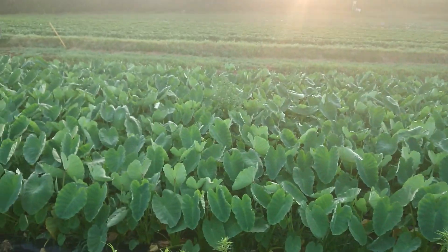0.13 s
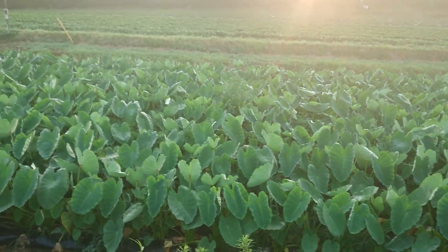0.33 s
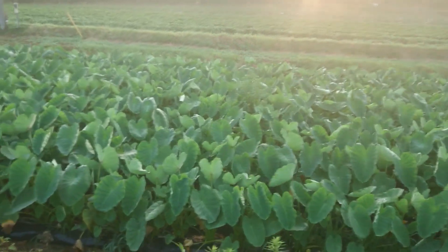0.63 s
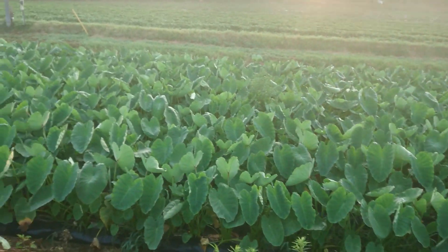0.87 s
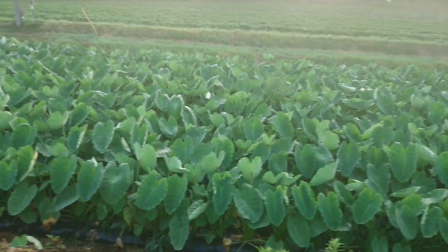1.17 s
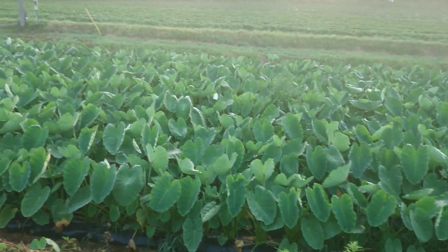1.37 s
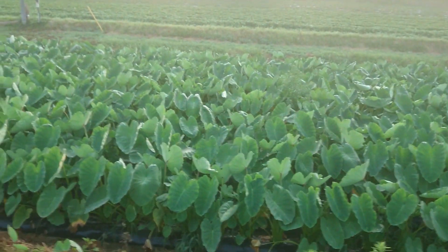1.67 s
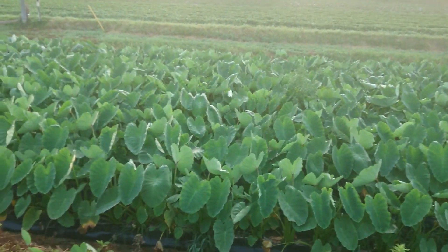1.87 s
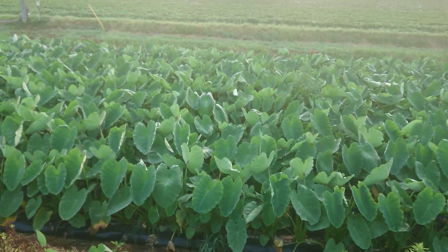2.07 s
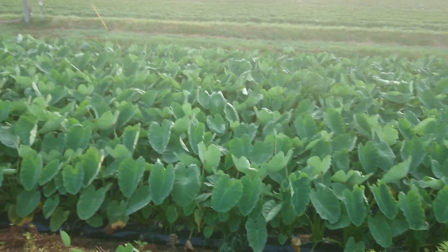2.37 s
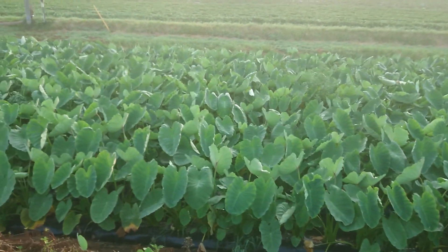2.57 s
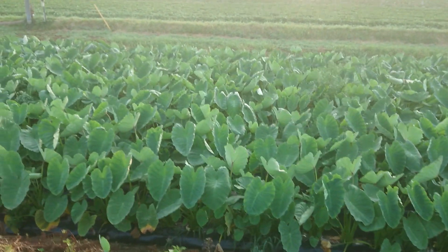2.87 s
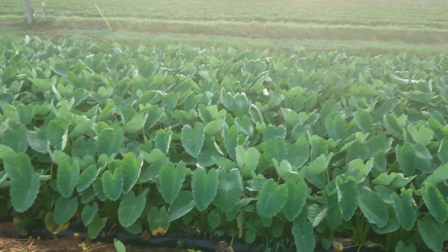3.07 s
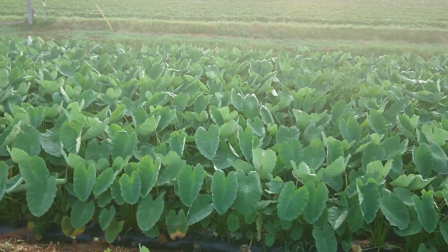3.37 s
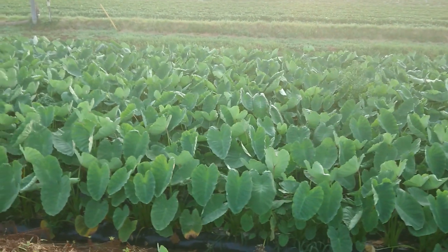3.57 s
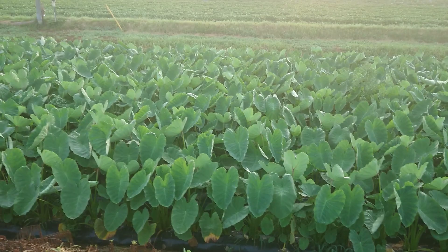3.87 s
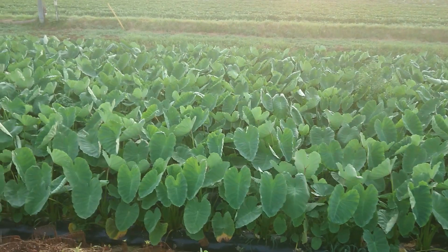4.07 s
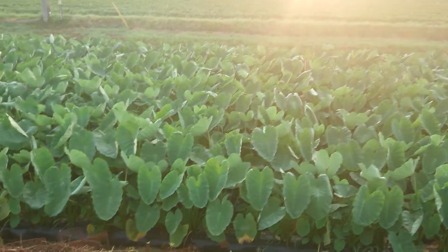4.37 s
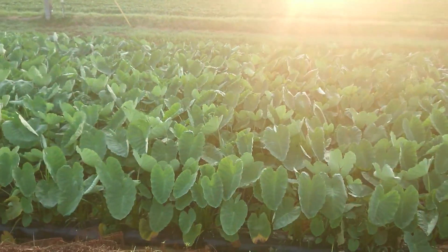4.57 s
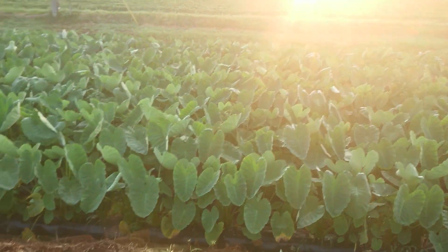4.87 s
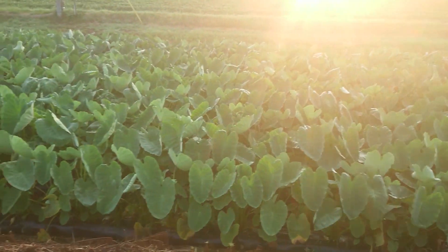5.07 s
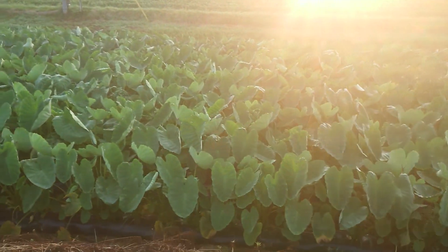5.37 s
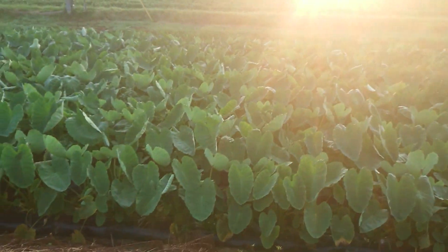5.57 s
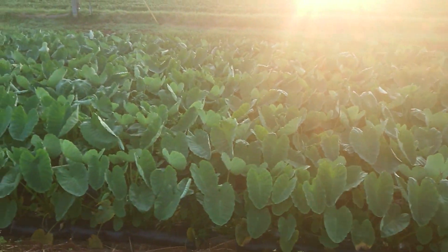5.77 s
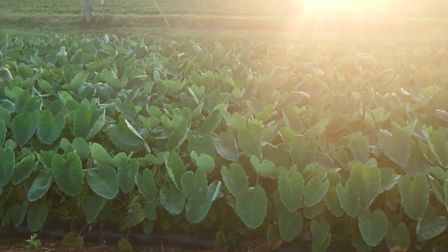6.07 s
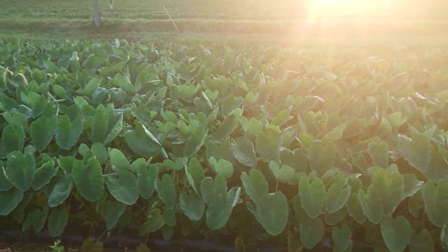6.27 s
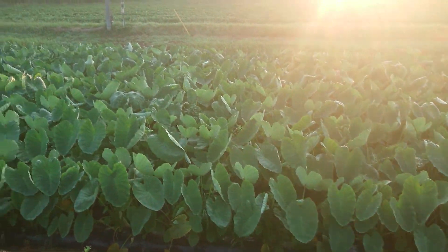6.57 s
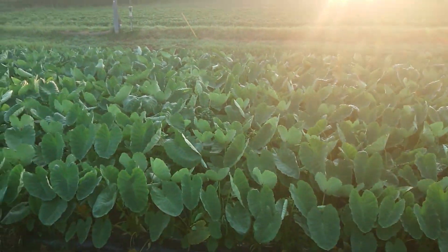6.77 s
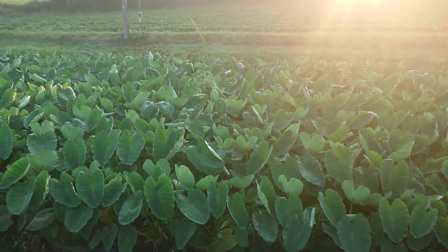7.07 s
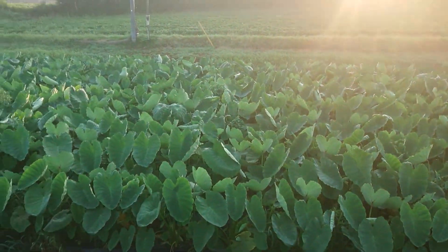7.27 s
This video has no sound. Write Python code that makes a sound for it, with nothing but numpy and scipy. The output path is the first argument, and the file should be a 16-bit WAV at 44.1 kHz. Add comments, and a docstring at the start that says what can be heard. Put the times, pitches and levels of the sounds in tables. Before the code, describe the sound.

An open crop field, heard on a handheld phone with uneven stereo and little echo. A far cicada chorus forms a constant bright hiss, shifting in colour, with one steady, whining singer on the right. Close shoes crack dry soil strongly at 1.05 s, again at 2.3 s and 6.0-6.2 s, with faint grit and small ticks between and soft low thuds. Short bird whistles come at 0.55 and 0.9 s, a faint one at 3.4, then several from 5.4 to 6.3 s. From 2.2 s a right-hand cicada swells, its throbbing song speeding and rising most around 4 s, weakening after 5.9 and stopping at 6.55. A coarse buzz on the left peaks near 4.7 s. Katydids rasp rapidly from 3.0 to about 5.3 s, louder left; fainter, very high rasps come from farther off at 1.9 s and after 5.1. Thin cricket tones enter around 5.9 s. Faint distant rumble lies beneath.

```python
"""A far chorus of cicadas at the edge of a farm field at dusk: click trains blurred into hiss. On the right one
cicada sings steadily (a few overtones) and one winds up (speeding clicks); on the left one buzzes (slow
clicks). Two katydids rasp close by and a fainter, higher one rasps too (bursts of clicks or noise), crickets
(thin tones) and small birds (bent tones) whistle. Shoes crunch on dry soil (ticks, knocks, grains and thuds)
over a low distant rumble (filtered noise). A hand-held phone hears it all through two unequal ports."""
import sys
import numpy as np
from scipy import signal
from scipy.fft import rfft, irfft
from scipy.io import wavfile
from scipy.ndimage import uniform_filter1d

SR = 44100
rng = np.random.default_rng(int(sys.argv[2]) if len(sys.argv) > 2 else 0)


def boost(x):
    """Linear amplitude factor 10**(x/20) for a level x in decibels (scalar or array-like)."""
    u = np.asarray(x, float) / 20
    return 10 ** u


def persist_wave(psi):
    """Save psi, clipped to +-1, as 16-bit WAV."""
    counts = np.round(np.clip(psi, -1, 1) * 32767).astype(np.int16)
    wavfile.write(sys.argv[1], SR, np.atleast_2d(counts).T)


N = 326996
T = np.arange(N) / SR  # time in seconds

# Tone colour of cicada song. Each row: frequency in Hz, strength in relative dB.
SONG_COLOUR = [(4950, -24.5), (5150, -5.5), (5600, -4.5), (6300, 2.5), (6800, -0.5), (7800, 1), (8300, 2),
               (9300, -3.5), (9550, -6), (11000, -24)]


def level(x, db):
    """Scale to an rms level (a kind of average loudness)."""
    return x * boost(db) / np.sqrt(np.mean(x ** 2))


def curve(rows):
    """Draw straight lines between the rows of a time table: one value per sample for each column."""
    s, *columns = np.transpose(rows)
    return [np.interp(T, s, c) for c in columns]


def colour(x, points, size=2048):
    """Filter through (Hz, dB) points without sounding early, using the cepstrum of the log gain."""
    hz, db = np.transpose(points)
    grid = np.arange(size // 2 + 1) * SR / size + 1
    log_gain = np.log(boost(np.interp(np.log(grid), np.log(hz), db)))
    cepstrum = irfft(log_gain)
    # fold the second half onto the first, so that the response starts at once
    cepstrum[1:size // 2] *= 2
    cepstrum[size // 2 + 1:] = 0
    response = irfft(np.exp(rfft(cepstrum)))
    return signal.oaconvolve(x, response)[:N]


def ring(x, hz, width):
    """One resonance, width in Hz, with gain 1 at the centre."""
    return signal.lfilter(*signal.iirpeak(hz, hz / width, fs=SR), x)


def walk(rate):
    """Random wandering: values held for 1 / rate seconds, then smoothed twice."""
    hold = int(SR / rate)
    steps = np.repeat(rng.standard_normal(N // hold + 1), hold)
    return uniform_filter1d(uniform_filter1d(steps, hold), hold)[:N]


def clicks(rate_hz, jitter, scatter_db):
    """A click each cycle, placed between samples; time (jitter in cycles) and size vary a little."""
    phase = np.cumsum(rate_hz + 0 * T) / SR + rng.random()
    chance = rng.standard_normal((N // 50, 2))
    cycles = np.arange(1, int(phase[-1]))
    chance = chance[:len(cycles)]
    at = np.interp(cycles + jitter * chance[:, 0], phase, np.arange(N))
    # spread each click over 17 samples, so that it can fall between two of them
    place = np.clip(at.astype(int)[:, None] + np.arange(-8, 9), 0, N - 1)
    taps = np.sinc(place - at[:, None]) * np.hanning(19)[1:-1]
    sizes = boost(scatter_db * chance[:, 1:])
    return np.bincount(place.ravel(), (taps * sizes).ravel(), N)


def crowd():
    """Click trains near one rate, blurred by distance into hiss."""
    trains = 0
    for hz in 238 + 9 * rng.standard_normal(3):
        swell = boost(3.0 * walk(1.5))
        trains = trains + swell * clicks(hz * (1 + .002 * walk(.8)), .002, 1.2)
    return colour(level(trains, -4) + rng.standard_normal(N), SONG_COLOUR)


def chorus():
    """One crowd ahead reaches both ports, one on each side its own port; low, middle and high swell apart."""
    # Each row: time in seconds, then low, middle and high singers in relative dB.
    group_levels = [(0, -39, -40.5, -34.5), (.6, -40.5, -39, -37.5), (3.2, -39.5, -36, -42.5),
                    (4.6, -37, -34, -50.5), (5.7, -40, -35.5, -46), (6.44, -36, -42, -42.5),
                    (6.58, -42.5, -37.5, -36.5), (7.41, -45, -50.5, -34.5)]
    # The two borders between low, middle and high singers, in Hz.
    group_edges = (7390, 7890)
    share = 0.07  # power of the song that both ports hear alike, from 0 to 1
    groups_db, ahead = curve(group_levels), crowd()
    ports = []
    for port_db in (-.6, .6):
        song = np.sqrt(share) * ahead + np.sqrt(1 - share) * crowd()
        under = [signal.sosfiltfilt(signal.butter(4, hz, fs=SR, output="sos"), song) for hz in group_edges]
        groups = under[0], under[1] - under[0], song - under[1]
        mix = sum(level(g, 0) * boost(db + 2.4 * walk(9)) for g, db in zip(groups, groups_db))
        ports.append(mix * boost(port_db - 4.0))
    return np.array(ports)


def steady_cicada():
    """An even click rate on the right: its overtones come and go, each on its own, as the air moves."""
    rate_hz, fade_db = 249.4, 7
    phase = 2 * np.pi * np.cumsum(rate_hz * (1 + .002 * walk(1) + .0015 * walk(100))) / SR
    tones = 0
    for k in range(31, 38):
        tone = np.sin(k * phase + 2 * np.pi * rng.random())
        tones = tones + boost(fade_db * walk(1.5)) * tone
    return level(tones, -42) * boost([[-8], [0]])  # left, right


def buzzing_cicada():
    """Slower clicks, each heard apart, ring one high resonance; louder on the left."""
    # Each row: time in seconds, level in dB at the left port before it wavers.
    buzz_levels = [(2.3, -55), (2.7, -43), (3.3, -49), (4.1, -39.5), (4.75, -36), (5.1, -38), (5.3, -41),
                   (5.75, -47)]
    body = clicks(118.8 * (1 + 0.0033 * walk(3.8)), 0.032, 1.9)
    for width in (300, 600, 900):
        body = ring(body, 9380, width)
    return level(body, 0) * boost(curve(buzz_levels)[0] + 2 * walk(11)) * boost([[0], [-10]])


def field():
    """Distant rumble and air: filtered noise, with the bass partly shared by both ports."""
    # Each row: frequency in Hz, noise strength in relative dB.
    air_colour = [(25, -71.5), (70, -62.5), (110, -72.5), (200, -81.5), (350, -83.5), (550, -93),
                  (900, -99.0), (1500, -94.5), (10000, -104), (12500, -110), (15500, -114)]
    shared, left, right = (colour(rng.standard_normal(N), air_colour, size=8192) for _ in range(3))
    common = ring(shared, 219, 314)
    both = np.array([left, right]) * 0.85 + 1.07 * common
    return both * boost(10 * np.log10(SR / 2) - 1.0)


def footsteps():
    """Cracks are a sharp tick on a dull knock; under each step grit crackles, and some steps thud."""
    # Clods and stalks cracking underfoot.
    # Each row: start in seconds, strength in relative dB, knock in Hz, tick in dB against that strength.
    cracks = [(0.058, -25.5, 1390, -11), (.595, -33, 1490, 1), (0.726, -18.5, 1970, -13.5),
              (1.035, -1, 1720, -21), (1.047, -19.5, 1800, 5.5), (1.0611, -11.5, 1710, -3),
              (1.067, -16, 1900, -9), (1.096, -9.5, 1970, -2), (1.164, -39.5, 2070, 9),
              (1.2, -23.5, 1090, -11.5), (1.876, -24, 450, -11.5), (2.274, -34, 885, 12),
              (2.286, -10, 1980, -9.5), (2.296, -19, 1810, 4), (2.298, -17, 1030, -3),
              (2.304, -13, 990, -13), (2.3134, -19.5, 1200, -2), (2.413, -28, 915, -8),
              (2.465, -18, 960, -23), (2.9, -19.5, 1970, -15.5), (2.986, -31.5, 1630, 1),
              (3.1, -28, 1370, -9), (3.539, -18.5, 1840, -13), (3.618, -25.5, 1850, -25),
              (3.719, -24.5, 850, -12), (3.839, -32, 1610, -7.5), (4.285, -36, 1000, -17.5),
              (4.478, -37.5, 1540, -2), (4.915, -29.5, 1660, -4.5), (4.974, -23, 1080, -33),
              (5.002, -23.5, 1330, -25), (5.094, -25, 2050, -11), (5.524, -25, 474, -24),
              (5.555, -30.5, 1980, -25), (5.599, -27.5, 2050, -2.5), (6.002, -11, 1860, -4.5),
              (6.024, -17, 2080, -3.5), (6.0383, -11.5, 1530, -4), (6.04, -3.5, 1880, -34),
              (6.1028, -24.5, 1310, 2), (6.111, -11, 1090, -10), (6.127, -28, 1480, 7.5),
              (6.198, -24, 1420, -23), (6.215, -23.5, 580, -20), (6.762, -33, 2230, 6.5),
              (7.377, -42, 824, 0)]
    # Weight rolling onto a shoe. Each row: start in seconds, grit in relative dB, length in seconds.
    shoe_loads = [(0.243, -54, 0.19), (0.497, -54, 0.22), (1.053, -35.5, 0.081), (1.748, -56.5, 0.26),
                  (2.284, -34.5, 0.08), (2.979, -51, 0.14), (3.529, -51.5, 0.2), (4.284, -53, 0.13),
                  (4.868, -53.5, 0.24), (5.523, -50, 0.18), (6.025, -41.5, 0.081), (6.098, -39.5, 0.06),
                  (6.73, -56, 0.22), (7.355, -54, 0.16)]
    # Dull thuds of the ground. Each row: time in seconds, level in dB.
    thuds = [(0.051, -35.5), (1.071, -33), (1.288, -35), (5.541, -33), (6.816, -31)]
    # Grain sizes. Each row: ringing frequency in Hz, width in Hz, level in relative dB.
    grain_sizes = [(633, 490, 3), (1100, 910, 2), (1630, 1200, 1), (3900, 2200, -8)]
    # Tone colour of dry soil. Each row: frequency in Hz, strength in relative dB.
    soil_colour = [(150, -7), (1000, 0.5), (2600, -10), (4000, -1), (6000, -8), (11000, -15), (16000, -61)]
    grains_per_s, extra_grains_per_load = 70, 12000  # a heavier step breaks more grains

    ticks, knocks, t = np.zeros(N + SR), np.zeros(N + SR), T[:800]
    crumbles = rng.standard_normal((len(cracks), len(t)))
    for (s, db, hz, tick_db), crumble in zip(cracks, crumbles):
        i = int(s * SR)
        span = slice(i, i + len(t))
        fade = np.exp(-t * hz / 1.78)  # a cycle or two
        knocks[span] += boost(db - 5.5) * fade * np.sin(2 * np.pi * hz * t) * np.minimum(t / 0.00029, 1)
        ticks[span] += boost(db + tick_db) * np.exp(-t / 0.0038) * crumble
        # loose bits settle
        knocks[span] += boost(db - 14.5) * np.exp(-t / 0.011) * ring(crumble, hz, hz / 2)

    load = 0
    for s, db, length in shoe_loads:
        rise = np.clip((T - s) / (0.057 * length), 0, 1)
        load = load + boost(db) * rise * np.exp(-((T - s) / length) ** 2)
    thud = 0
    for s, db in thuds:
        thud = thud + boost(db) * np.clip((T - s) / 0.0067, 0, 1) * np.exp(-np.abs(T - s) / 0.034)

    # each size of grain breaks at its own moments and rings for a cycle or two
    shape = (len(grain_sizes), N)
    breaks = rng.random(shape) < (grains_per_s + extra_grains_per_load * load) / SR
    breaks = breaks * boost(4.8 * rng.standard_normal(shape))
    crunch = 0
    for grains, (hz, width, db) in zip(breaks, grain_sizes):
        crunch = crunch + level(ring(ring(grains, hz, width), hz, 2 * width), db) / 2
    # the rustle differs at each port
    rustle = level(np.array([colour(rng.standard_normal(N), soil_colour) for _ in range(2)]), -8)
    ground = level(ring(ring(rng.standard_normal(N), 73, 44), 93, 300), 0) * thud
    return knocks[:N] + boost(5.5) * colour(ticks[:N], soil_colour) + (crunch + rustle) * load + ground


def whistles():
    """Small birds: short, slightly husky glides, bent through three pitches."""
    # Each row: start in seconds, length in seconds, first, middle and last pitch in Hz,
    # level in dB before the huskiness.
    glides = [(0.547, 0.085, 3750, 3400, 2740, -51), (0.875, 0.077, 3960, 4870, 6050, -45.5),
              (3.408, 0.066, 3750, 3680, 3400, -60), (5.43, 0.068, 5600, 4670, 4460, -54),
              (5.642, 0.053, 4300, 4900, 4070, -47), (5.83, 0.054, 4100, 4760, 4100, -49),
              (6.297, 0.088, 3210, 3770, 4830, -56)]
    out = np.zeros(N)
    for s, length, first, middle, last, db in glides:
        u = np.arange(int(length * SR)) / (length * SR)  # 0 to 1 along the glide
        hz = first * (1 - u) * (1 - 2 * u) + 4 * middle * u * (1 - u) + last * u * (2 * u - 1)
        i = int(s * SR)
        out[i:i + len(u)] += boost(db) * np.sin(np.pi * u) * np.sin(2 * np.pi * np.cumsum(hz) / SR)
    return out * boost(7.0 * walk(250))


def strokes(times, db):
    """A short rounded swell at each wing stroke, uneven in strength."""
    shape = np.exp(-(np.arange(-1000, 1001) / SR / 0.0093) ** 4)  # 9.3 ms to each side
    sizes = boost(db + 1.1 * rng.standard_normal(len(times)))
    return signal.oaconvolve(np.bincount((times * SR).astype(int), sizes, N), shape, "same")


def high_katydid():
    """Wing strokes of a fainter, higher katydid, in bouts: narrow, high noise, half blurred."""
    # Each row: start in seconds, length in seconds, stroke level in dB before the blur is added.
    bouts = [(1.857, 0.6, -57), (5.138, 0.31, -52.5), (5.81, 0.26, -55), (6.364, 0.42, -60),
             (6.99, .36, -62)]
    gap_s, hz, width_hz = .056, 14900, 2000
    stroke = sum(strokes(np.arange(s, s + length, gap_s), db) for s, length, db in bouts)
    stroke = stroke + boost(2) * uniform_filter1d(stroke, int(.08 * SR))
    rasp = [ring(ring(rng.standard_normal(N), hz, width_hz), hz, width_hz) for _ in range(2)]
    return level(np.array(rasp), 0) * stroke


def winding_cicada():
    """Steady clicks speed up, so their overtones slide through the body resonances; the song throbs."""
    # Body resonances. Each row: frequency in Hz, width in Hz, early and late strength in relative dB.
    resonances = [(6300, 600, 0, -4), (6970, 300, -1, 7), (7550, 500, 2, -2), (8300, 500, -8, -10)]
    low_hz, high_hz, middle_s, ease_s = 401, 504.5, 4.05, .62  # the click rate climbs in an S
    start_s, stop_s, attack_s, release_s = 2.2, 6.55, 1.2, .05
    start_db, swell_db_per_s = -40, 1.7
    tire_s, tire_db_per_s = 5.9, -14  # the song tires before it stops
    body_shift_s = 5.1  # the ring of the body moves down around here

    hz = low_hz + (high_hz - low_hz) / (1 + np.exp((middle_s - T) / ease_s))
    gate = np.clip(np.minimum((T - start_s) / attack_s, (stop_s - T) / release_s), 0, 1)
    tiring_db = tire_db_per_s * np.clip(T - tire_s, 0, None)
    swell = gate * boost(start_db + swell_db_per_s * (T - start_s) + tiring_db)
    train = clicks(hz * (1 + .005 * walk(70)), .003, 2.0)
    late = np.clip(T - body_shift_s + .5, 0, 1)
    body = 0
    for centre, width, early_db, late_db in resonances:
        gain = boost(early_db + (late_db - early_db) * late)
        body = body + gain * ring(ring(train, centre, width), centre, width)
    throb = 1 + 0.29 * np.sin(2 * np.pi * np.cumsum(26 * (1 + 0.033 * walk(2.98))) / SR)
    return level(colour(body, SONG_COLOUR) * throb, 0) * swell * boost([[-7], [0]])  # left, right


def wing(x):
    """The broad ring of the wings, cut off steeply below."""
    # Each row: frequency in Hz, strength in relative dB.
    wing_colour = [(10000, -2), (11000, 0), (12400, 0.5), (14800, 0), (16000, -2.5)]
    return level(colour(x, [(8000, -60)] + wing_colour), 0)


def katydid():
    """Each wing stroke scrapes a file: a burst of uneven tooth clicks, with a soft echo from the leaves."""
    # Phrases overlap where two sing. Each row: first stroke in seconds, number of strokes,
    # first gap in seconds, first and last stroke level in dB at the left port.
    phrases = [(3.018, 6, .0523, -42, -32), (3.334, 25, .0563, -35, -30), (3.621, 28, .0507, -37, -28)]
    slowing_s = .00028  # each gap is longer than the one before
    stroke = 0
    for s, count, gap, first_db, last_db in phrases:
        k = np.arange(count)
        times = s + gap * k + slowing_s * k * k / 2
        stroke = stroke + strokes(times, np.linspace(first_db, last_db, count))
    echo = boost(-11) * uniform_filter1d(stroke, int(.06 * SR))
    teeth = rng.standard_normal(N) * boost(4 * np.minimum(rng.exponential(size=N), 4))
    direct = wing(teeth) * stroke * boost([[0], [-6]])
    return direct + echo * [wing(rng.standard_normal(N)) for _ in range(2)]


def cricket():
    """Thin tones with a slightly rough edge; each creeps in and sinks, and one drifts up."""
    # Each row: start in seconds, attack in seconds, first pitch in Hz, rise in Hz per second,
    # starting level in dB, fade in dB per second.
    chirps = [(5.85, .35, 5140, 60, -51, -2), (6.08, .1, 5270, 0, -54, -12)]
    out = 0
    for s, attack, hz, rise, db, fade_db in chirps:
        after = np.clip(T - s, 0, None)
        tone = np.sin(2 * np.pi * np.cumsum(hz + rise * after + 12 * walk(150)) / SR)
        out = out + tone * np.minimum(after / attack, 1) * boost(db + fade_db * after + 2 * walk(6))
    return out


def scene():
    """All sources as they reach the two ports."""
    near = footsteps() + whistles()
    cicadas = chorus() + steady_cicada() + winding_cicada() + buzzing_cicada()
    return near + cicadas + cricket() + katydid() + high_katydid() + field()


def roll_off(x):
    """The treble ends steeply here."""
    return signal.sosfilt(signal.butter(12, 15950, fs=SR, output="sos"), x)


def record(dry):
    """The right port sits a little further along and has a resonant duct; deep bass is cut."""
    # Right port against the left. Each row: frequency in Hz, gain in dB.
    right_duct = [(60, -1.5), (200, -6), (450, -11.5), (1000, -2.5), (1500, -1), (1950, 12.5), (2250, 5.5),
                  (2650, -3.5), (5500, -2.5), (8000, 3.5), (10500, -2), (12200, -28), (14000, -9)]
    right = np.roll(colour(dry[1], right_duct), 2)  # two samples later
    ports = np.array([dry[0], right])
    mix = signal.sosfilt(signal.butter(3, 42, "high", fs=SR, output="sos"), ports)
    return roll_off(mix)


dry = scene()
out = record(dry)
persist_wave(out)
```